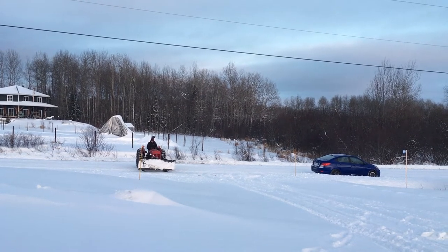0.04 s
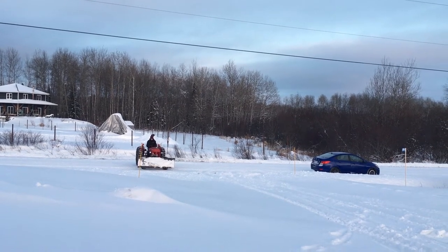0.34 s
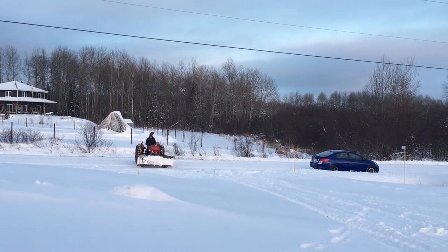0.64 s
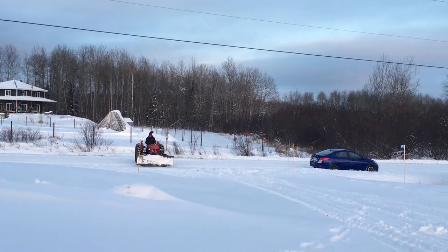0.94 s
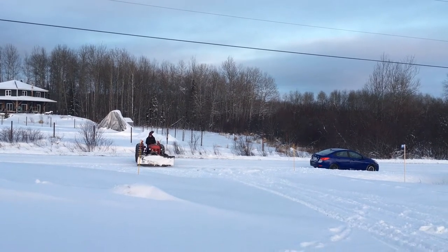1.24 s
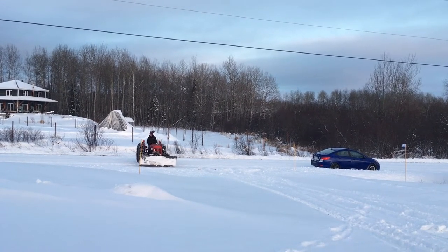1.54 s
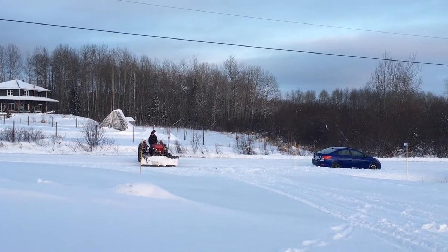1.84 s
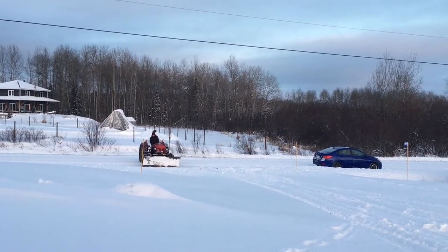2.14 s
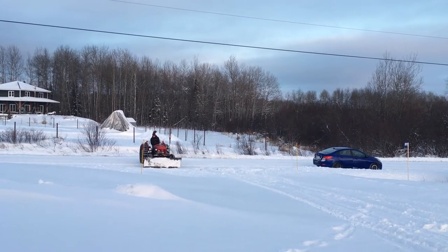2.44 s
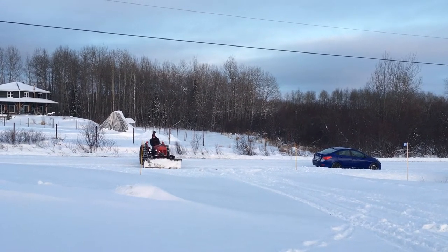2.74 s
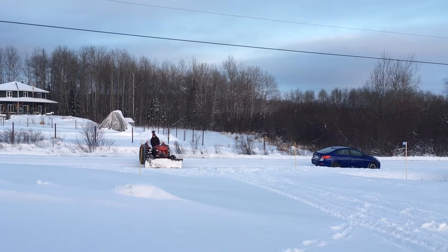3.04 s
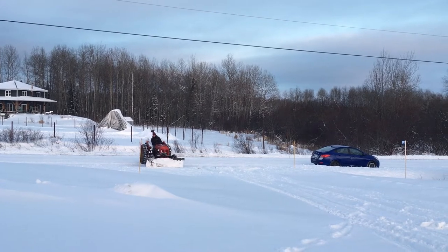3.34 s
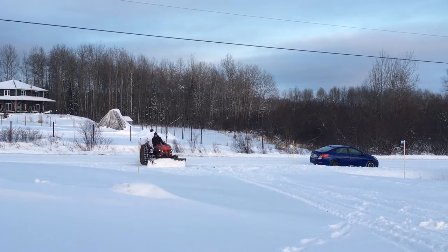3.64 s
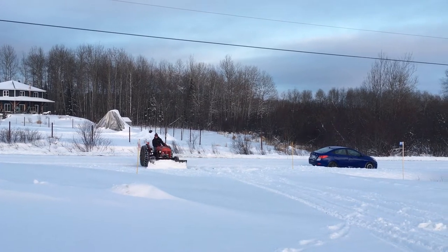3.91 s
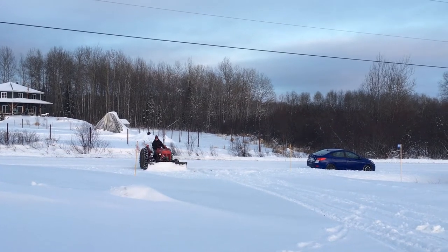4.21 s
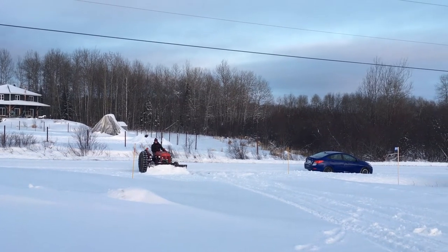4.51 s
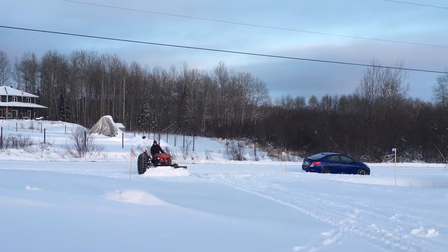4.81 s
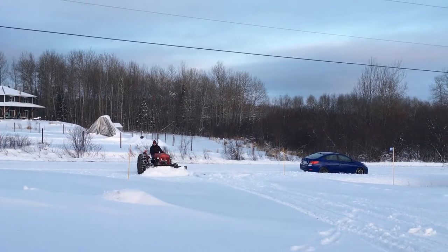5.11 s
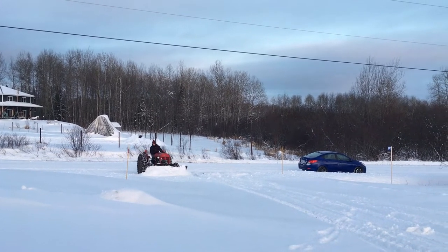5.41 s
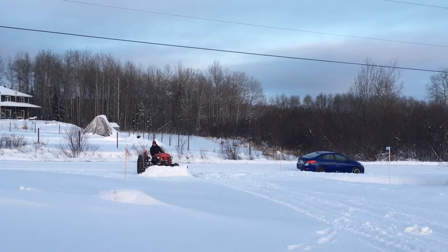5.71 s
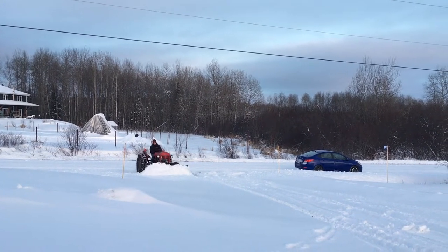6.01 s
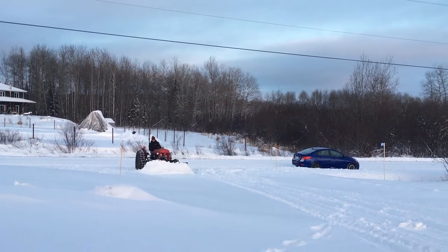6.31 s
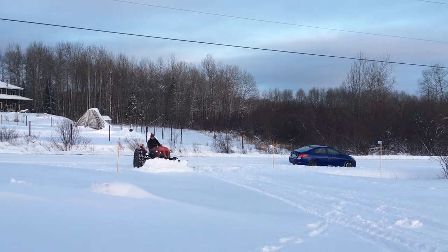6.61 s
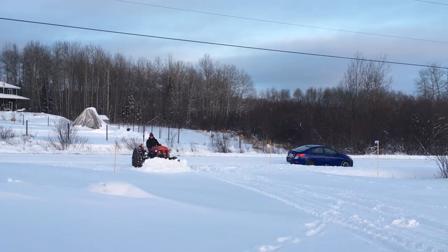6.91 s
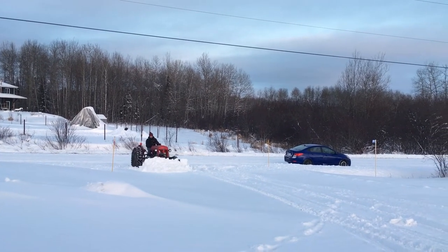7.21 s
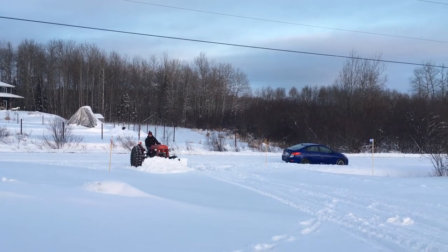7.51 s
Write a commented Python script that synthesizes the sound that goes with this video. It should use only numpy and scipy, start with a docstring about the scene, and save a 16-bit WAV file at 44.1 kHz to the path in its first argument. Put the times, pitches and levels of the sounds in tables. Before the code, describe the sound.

A four-cylinder petrol tractor idles some way off in an open, snowy yard with no echo. At about 0.5 seconds a faint switch clicks and a small geared motor starts a rasping whine, working the plough blade. The idle sags and stumbles around 1.5 seconds, and the whine drops slightly in pitch. At 2.4 seconds the throttle opens and the whine stops. The engine climbs and gets louder, straining with metallic knocks and a ragged growl, and the exhaust coughs at about 3 and 4 seconds. Around 3.5 seconds the blade bites the snow with a short, soft, grainy scrape. From there the engine holds high revs with a low exhaust drone, mechanical roar and occasional knocks, slowing slightly as the tractor comes nearer. Steel tyre chains clink thinly from about 3.3 seconds, jingling more often from 6 seconds until the end, near 7.7 seconds.

```python
"""A snowy yard, one microphone in the open, a four-cylinder petrol tractor idling some way off.
Half a second in, a switch clicks, a small geared motor whines to work the plough blade, and the idle sags.
At 2.4 s the throttle opens; the motor stops, and the straining engine knocks, growls and coughs.
Around 3.5 s the blade scrapes into the snow. The tractor comes nearer at high revs, exhaust
droning through its pipe, steel tyre chains jingling as the wheels roll."""
import sys
import numpy as np
from scipy import signal
from scipy.fft import rfft, irfft
from scipy.io import wavfile

SR = 44100
rng = np.random.default_rng(int(sys.argv[2]) if len(sys.argv) > 2 else 0)


def int16_out(signal):
    """Quantize to a 16-bit WAV file."""
    q = np.round(np.clip(np.atleast_2d(signal).T, -1, 1) * 32767)
    wavfile.write(sys.argv[1], SR, q.astype(np.int16))


N = 341775
T = np.arange(N) / SR
HZ = np.fft.rfftfreq(N, 1 / SR)
IDLE_RATE = 26.2  # firings per second
THROTTLE_OPENS_S = 2.428

# Knock of the four cylinders, in firing order. Each entry: relative level in dB.
CYLINDER_KNOCK_DB = [-2, 1.4, 5.5, 3]
# Resonances of engine block and bonnet. Each row: pitch in Hz, width in Hz, relative level in dB.
BLOCK_MODES = [(631, 77, -5), (847, 49, -5), (1020, 47, -6.5), (1206, 48, 4), (1770, 87, 4.5),
               (1870, 72, 4), (2390, 270, 2), (2983, 79, 0), (3145, 136, -4), (3540, 290, -8),
               (4130, 190, -23), (6450, 260, -18)]
# Resonances of small steel parts such as chain links. Each row: pitch in Hz, width in Hz, relative dB.
STEEL_MODES = [(6880, 60, 13), (8450, 120, -8), (9330, 54, 7), (11400, 74, 16), (11800, 150, 2),
               (13130, 90, 13), (13730, 53, 16), (15200, 60, 9), (15650, 250, 3)]


def amp(db):
    """Decibels to gain."""
    return 10 ** (np.asarray(db) / 20)


def unit(x):
    """Scales to rms 1."""
    return x / np.sqrt(np.mean(x ** 2) + 1e-20)


def curve(rows):
    """Joins rows of (seconds, value) into a value at every sample."""
    return np.interp(T, *np.transpose(rows))


def ramp(start_s, length_s):
    """Rises from 0 to 1 and stays there."""
    return np.clip((T - start_s) / length_s, 0, 1)


def response(spectrum):
    """Causal frequency response through rows of (Hz, dB)."""
    hz, db = np.transpose(spectrum)
    log_hz = np.log(abs(np.fft.fftfreq(N, 1 / SR)) + 1)
    log_gain = np.log(amp(np.interp(log_hz, np.log(hz + 1), db)))
    return np.exp(np.conj(signal.hilbert(log_gain)))[:len(HZ)]


def colour(x, spectrum):
    """Passes x through a body with the given spectrum; rms 1."""
    return unit(irfft(rfft(x) * response(spectrum), N))


def ringing(x, modes, direct=0):
    """Passes x through resonances (Hz, width in Hz, dB); a part may pass directly; rms 1."""
    body = direct + sum(amp(db) / (1 + 2j * (HZ - hz) / width) for hz, width, db in modes)
    return unit(irfft(rfft(x) * body, N))


def noise():
    """White noise."""
    return rng.standard_normal(N)


def wander(hz):
    """Random drift up to about the given rate; rms 1."""
    return unit(irfft(rfft(noise()) * np.exp(-(HZ / hz) ** 2), N))


def bursts(cycles, rise, fall):
    """An envelope that jumps and dies once a cycle; rise and fall are parts of a cycle."""
    age = cycles % 1
    return unit((1 - np.exp(-age / rise)) * np.exp(-age / fall))


def add(mix, start_s, sound):
    """Mixes a sound in at the given time."""
    part = mix[round(start_s * SR):][:len(sound)]
    part += sound[:len(part)]


def still_air(level_db=-53):
    """The faint, low hush of the yard around the microphone."""
    # Each row: frequency in Hz, relative level in dB.
    hush = [(25, -21), (60, 14.5), (200, -11.5), (400, -13.5), (1200, -10.5), (4000, -44), (5000, -46),
            (8500, -27), (9600, -31), (10400, -48), (11300, -32), (16000, -37)]
    return amp(level_db) * colour(noise(), hush)


def tyre_chains(links_per_s=420, spread_db=-4.5, tap_s=0.0073):
    """Many links tap in clumps as the wheels roll, most of them muffled by snow."""
    # Loudness of the chains. Each row: time in seconds, level in dB.
    levels = [(2.6, -83), (3.3, -48), (4.0, -67), (5.0, -48), (6.1, -49), (6.25, -45), (6.9, -44),
              (7.75, -41)]
    # Their overall colour. Each row: frequency in Hz, relative level in dB.
    jingle = [(3000, 0.5), (5200, -39), (7000, 7.5), (9300, 5.5), (10400, -2), (11400, 1.5), (14000, 2),
              (14800, -2), (16000, 5)]
    hits = rng.random(N) < amp(2.2 * wander(12)) * links_per_s / SR
    sizes = amp(spread_db * np.minimum(rng.exponential(1, N), 3))
    taps = signal.lfilter([1], [1, -np.exp(-1 / SR / tap_s)], hits * sizes) * noise()
    return amp(curve(levels)) * colour(ringing(taps, STEEL_MODES, direct=1.2), jingle)


def switch_and_clinks(ring_s=0.0074, click_s=0.004, click_db=-7, gain_db=-11, others_db=-9, scatter_db=3):
    """Metal strikes metal in switch or chain: a click and a short high ring, one mode above the others."""
    # A faint switch click as the blade motor starts, then the loudest chain clinks.
    # Each row: start in seconds, relative level in dB, leading pitch in Hz.
    strikes = [(0.537, -49, 13130), (1.886, -33.5, 11800), (3.46, -26, 8450), (3.5846, -28.5, 9330),
               (4.4712, -27, 9330), (5.3094, -34, 13130), (6.2362, -27, 13130), (6.499, -36, 6880),
               (6.8353, -32, 9330), (6.9156, -29, 13730), (7.0214, -25.5, 6880), (7.0927, -29, 13130),
               (7.3277, -24, 13130)]
    t, out = np.arange(SR // 16) / SR, np.zeros(N)
    mode_hz = np.array(STEEL_MODES)[:, 0]
    for start_s, db, lead_hz in strikes:
        heights = amp(others_db + scatter_db * rng.standard_normal(len(mode_hz)))
        heights[np.argmin(abs(mode_hz - lead_hz))] = 1
        tones = np.sin(2 * np.pi * (mode_hz[:, None] * t + rng.random((len(mode_hz), 1))))
        ring = heights @ tones * np.exp(-t / ring_s)
        click = np.diff(rng.standard_normal(len(t) + 1)) * np.exp(-t / click_s)
        add(out, start_s, amp(db + gain_db) * (ring + amp(click_db) * click))
    return out


def blade_scrape(centre_s=3.524, half_width_s=0.31, level_db=-45):
    """The blade bites into the snow crust: a short swell of fine grains."""
    # Each row: frequency in Hz, relative level in dB.
    crust = [(2000, 2.5), (5500, -7), (8500, 1.0), (10500, -5.0), (13500, -9), (16000, -21)]
    grains = colour(noise() * amp(2.0 * wander(900)), crust)
    return amp(level_db) * np.exp(-((T - centre_s) / half_width_s) ** 2) * grains


def blade_motor(running, level_db=-49, octave_db=10.5, whine_db=-2.7, rasp_db=-2.5, flutter=0.0021):
    """Gear teeth whine and rasp in a small housing; pitch and level sag as the blade takes the load."""
    # Each row: time in seconds, pitch in Hz.
    pitch = [(.58, 255), (.7, 264), (.81, 270), (.89, 265), (.99, 274), (1.08, 270), (1.17, 275),
             (1.27, 270), (1.37, 271), (1.46, 260), (1.54, 256), (1.63, 242), (1.75, 240.5), (1.82, 237),
             (1.93, 241.5), (2.03, 238), (2.13, 243), (2.24, 237), (2.36, 243), (2.42, 241), (2.55, 249)]
    # Colours of the gearbox whine and of the rasp. Each row: frequency in Hz, relative level in dB.
    gearbox = [(240, -1.5), (275, -10), (380, -11), (500, -4.5), (720, -4), (830, 0), (1100, -1),
               (1400, 3.5), (1670, 6.5), (1900, -10), (2450, -0.5), (2900, -5), (3300, -3), (3900, -10.5),
               (4400, -9.5), (4950, -25), (5300, -13), (6000, -36)]
    rasp_spectrum = [(250, -15.5), (400, -21), (600, -27), (1100, -19), (1600, 1.5), (2000, -9),
                     (3300, -6.5), (3800, -14), (4500, -12), (5000, -23), (5500, -22), (9000, -20.5),
                     (10400, -23), (11500, -22.5), (16000, -28)]
    hz = curve(pitch)
    meshes = np.cumsum(hz * (1 + flutter * wander(27.3))) / SR
    teeth = sum(np.cos(2 * np.pi * k * meshes + .5 * wander(34)) * amp(2.3 * wander(10))
                for k in range(1, 24))
    rasp = noise() * (.5 + bursts(meshes, rise=0.12, fall=0.68)) * amp(2.0 * wander(47))
    sound = amp(whine_db) * colour(teeth, gearbox) + amp(rasp_db) * colour(rasp, rasp_spectrum)
    surge_db = 1.5 * wander(24)
    return running * amp(level_db + octave_db * np.log2(hz / hz.max()) + surge_db) * sound


def coughs():
    """The exhaust coughs and thumps: low pushes of air, a cycle or two long."""
    # Each row: centre in seconds, peak level in dB, pitch in Hz, half-width in seconds.
    pushes = [(.152, -43, 330, .0017), (3.016, -24.5, 175, .0055), (3.158, -39, 190, .006),
              (4.066, -35.5, 185, .007), (4.073, -25, 62, .014)]
    return sum(-amp(db) * np.exp(-((T - s) / width) ** 2) * np.cos(2 * np.pi * hz * (T - s))
               for s, db, hz, width in pushes)


def growl(firings, strain, level_db=-49.5, ragged_db=2.5):
    """Under strain each puff leaves the pipe with a ragged low burst."""
    # Each row: frequency in Hz, relative level in dB.
    spectrum = [(50, -33), (100, -16), (125, 9), (150, -4), (200, -12.5), (270, -17), (400, -32),
                (900, -50)]
    puffs = noise() * (.5 + bursts(firings, rise=0.13, fall=.4)) * amp(ragged_db * wander(9.4))
    return amp(level_db) * strain * colour(puffs, spectrum)


def block_pings(firings, rattle_db, tick_db=-54.5, tick_hz=3090, knock_gain_db=-7.5):
    """Ticks, loose parts and hard knocks ping the block; one mode leads, narrow modes ring longest."""
    # The ring of the loose parts. Each entry: pitch in Hz.
    loose_hz = [900, 1002, 1030, 1203, 1778, 1832, 2380, 2980, 3410]
    # Hard knocks, most under load. Each row: time in seconds, relative level in dB, leading pitch in Hz.
    hard_knocks = [(0.083, -44.5, 3040), (0.154, -43, 1630), (0.521, -46.5, 3100), (2.51, -38, 1730),
                   (2.625, -37.5, 1720), (2.66, -35, 1730), (2.70, -34.5, 1810), (2.741, -36.5, 1720),
                   (2.774, -36, 1760), (2.812, -40, 1800), (2.848, -33.5, 1780), (2.876, -38, 3040),
                   (2.938, -28, 1863), (2.967, -35, 1863), (2.992, -35.5, 1860), (3.019, -36, 2990),
                   (3.045, -38, 3000), (3.161, -34, 3100), (3.27, -33, 3000), (3.29, -33.5, 3050),
                   (3.309, -31, 1810), (3.368, -33.5, 1805), (3.405, -29, 1880), (3.88, -35, 1790),
                   (4.94, -29.5, 1880), (5.456, -40, 1710), (5.655, -31, 1920), (5.729, -31.5, 1870),
                   (6.137, -33, 1770), (6.695, -35, 1780), (7.085, -33, 1750), (7.285, -35, 1856)]
    fired_s = T[np.flatnonzero(np.diff(np.floor(firings)) > 0)]
    # One cylinder ticks once an engine cycle. A blow: seconds, dB, leading Hz, that mode's lead in dB.
    blows = [(s, tick_db, tick_hz, 4) for s in fired_s[2::len(CYLINDER_KNOCK_DB)]]
    for s in fired_s:  # a loose part rattles on every firing
        db = rattle_db[round(s * SR)] + 3 * rng.standard_normal()
        lead_hz = rng.choice(loose_hz) * (1 + 0.0184 * rng.standard_normal())
        blows.append((s, db, lead_hz, 4))
    for s, db, lead_hz in hard_knocks:  # each lands on the nearest firing
        blows.append((fired_s[np.argmin(abs(fired_s - s))], db + knock_gain_db, lead_hz, 6.5))

    rise_s, ring_stretch, tilt_db, scatter_db = 0.0032, 1.96, 2, 4
    t, pings = np.arange(SR // 16) / SR, np.zeros(N)
    block_hz, width, mode_db = np.array(BLOCK_MODES).T[:, :, None]
    dying = np.exp(-np.pi * width * t / ring_stretch) * (1 - np.exp(-t / rise_s))
    for s, db, lead_hz, lead_db in blows:
        hz, lead = block_hz.copy(), np.argmin(abs(block_hz - lead_hz))
        heights = amp(mode_db + tilt_db * np.log2(hz) + scatter_db * rng.standard_normal(hz.shape))
        hz[lead], heights[lead] = lead_hz, heights.max() * amp(lead_db)
        envelopes = dying * heights
        envelopes /= np.sqrt((envelopes ** 2).sum(0).max() / 2)
        tones = np.sin(2 * np.pi * (hz * t + rng.random(hz.shape)))
        add(pings, s, amp(db) * (envelopes * tones).sum(0))
    return pings


def machinery(firings, throttle, strain, level_db, scatter_db=2.5):
    """Each firing knocks the block, over the throbbing roar of fan and gears."""
    # Fan and gears. Each row: frequency in Hz, relative level in dB.
    roar_spectrum = [(120, -20.5), (250, -13.5), (370, -7.5), (450, -13.5), (560, -4.5), (720, -5.5),
                     (900, -0.5), (1200, -2.5), (1500, -2.5), (1880, -4.5), (2150, -7.5), (2750, -11.5),
                     (3050, -8.5), (3800, -13.5), (4900, -25), (9000, -42.5)]
    count = np.floor(firings).astype(int)
    cylinder_db = np.take(CYLINDER_KNOCK_DB, count, mode="wrap")
    force = amp(cylinder_db + scatter_db * rng.standard_normal(500)[count])
    knock = ringing(force * bursts(firings, rise=0.14, fall=0.24) * noise(), BLOCK_MODES)
    throb = 1 + .22 * bursts(firings, rise=.14, fall=.4)
    roar = colour(noise() * throb * amp(0.2 * wander(210) + .5 * wander(51)), roar_spectrum)
    knock_share = 0.16 * (1 - throttle) + 0.087 * throttle + 0.47 * strain
    return amp(level_db) * (np.sqrt(knock_share) * knock + np.sqrt(1 - knock_share) * roar)


def hiss_and_valves(firings, throttle, strain, level_db, valve_db=-9.5, valve_idle_db=1):
    """Each firing ticks a valve and spits a puff of exhaust hiss, harder under strain."""
    # Exhaust hiss. Each row: frequency in Hz, relative level in dB.
    hiss_spectrum = [(2500, -34), (4900, -5), (5200, 7), (5500, 4), (6400, 4.5), (7600, -1), (9400, 3.5),
                     (10400, -2), (11500, -1.5), (13500, -4), (14700, -7), (16000, -5.5)]
    # Ring of the valve gear. Each row: pitch in Hz, width in Hz, relative level in dB.
    valve_modes = [(6380, 240, 4), (8640, 200, -7), (11100, 500, -14)]
    puffs = 1 + (0.2 + 0.14 * strain) * bursts(firings, rise=0.073, fall=0.15)
    hiss = colour(noise() * puffs * amp(0.45 * wander(500) + wander(30)), hiss_spectrum)
    valves = ringing(bursts(firings, rise=0.057, fall=0.095) * noise(), valve_modes)
    return amp(level_db) * (hiss + amp(valve_db + valve_idle_db * (1 - throttle)) * valves)


def puff_shape(rate, strain):
    """Puffs are sharp at idle and stumble as it slows; once the pipe fills they are long and round."""
    full = ramp(2.68, 0.095)
    idle_tilt_db = 9 + 0.63 * (rate - IDLE_RATE)
    tilt_db = (1 - full) * idle_tilt_db + full * strain * 11  # per octave of order
    top_order = np.maximum(4.92 + full * (2.47 - 5.2 * strain), 1)  # higher orders fall away
    stumble = 0.06 * (IDLE_RATE / rate) ** 3
    uneven = (1 - full) * stumble + full * 0.059 + strain * 0.2
    return tilt_db, top_order, uneven


def exhaust(firings, rate, strain, noise_db, rumble_db=-13):
    """The orders of the firing rate slide through the pipe's resonances; ragged burning adds rumble."""
    # The exhaust note at the microphone. Each row: time in seconds, level in dB.
    note_levels = [(0.05, -35), (0.67, -34.5), (1.21, -39), (1.29, -35.5), (1.77, -41.5), (1.79, -37),
                   (2.34, -37), (2.71, -34.5), (2.73, -38), (2.86, -28.5), (3.01, -35.5), (3.24, -28),
                   (3.33, -32.5), (3.67, -26), (5.35, -27), (6.61, -32), (7.75, -31)]
    # Colours of silencer with tailpipe, and of the rumble. Each row: frequency in Hz, relative dB.
    pipe_spectrum = [(20, -41), (28, -54), (35, 0), (42, 10), (58, 9), (82, 4.5), (113, 7.5), (126, -10.5),
                     (138, -31), (151, -9), (162, -29), (172, -18.5), (200, -29.5), (230, -30.5),
                     (290, -25), (400, -29)]
    rumble_spectrum = [(20, -42), (28, -25), (40, 15.5), (70, -11.5), (112, 12.5), (135, -6), (165, -49),
                       (260, -19), (500, -25), (1500, -56)]
    tilt_db, top_order, uneven = puff_shape(rate, strain)
    pipe, note, power = response(pipe_spectrum), 0, 0
    shaken = firings + .07 * uneven * wander(14)
    for order in range(1, 9):
        puff = amp(tilt_db * np.log2(order)) / (1 + (order / top_order) ** 8)
        height = np.interp(order * rate, HZ, pipe) * puff
        note += (height * np.exp(2j * np.pi * order * shaken)).real
        power += abs(height) ** 2 / 2
    note = note / np.sqrt(power) * (1 + .5 * uneven * wander(44))
    rumble = colour(noise(), rumble_spectrum) * (1.33 + 6 * uneven) * amp(noise_db + rumble_db)
    return amp(curve(note_levels)) * note + rumble


def loudness(law, rate, throttle):
    """Level in dB from throttle, engine speed and the approach to the microphone."""
    idle_db, open_db, octave_db, approach_db = law
    driving_s = np.maximum(T - THROTTLE_OPENS_S, 0)
    return idle_db + open_db * throttle + octave_db * np.log2(rate / IDLE_RATE) + approach_db * driving_s


def scene():
    """The tractor from one spot in the open yard; snow swallows the echoes."""
    # Engine speed. Each row: time in seconds, firings per second.
    speed = [(0.0, 27.44), (0.65, 27.4), (0.9, 26.5), (1.2, 25.1), (1.36, 23), (1.5, 19.7), (1.64, 18.5),
             (1.95, 20.8), (2.3, 19.9), (2.5, 19.9), (2.62, 21.3), (2.75, 26.45), (3.05, 40.15),
             (3.3, 50.8), (3.555, 55.09), (3.917, 57.59), (4.5, 57.32), (4.994, 56.95), (5.7, 54.55),
             (6.46, 51.85), (7.1, 50.79), (7.75, 49.8)]
    # Loudness of engine noise and of hiss. Each lists: dB at idle, then dB added by open throttle,
    # per octave of speed and per second of approach.
    noise_law = (-57, 10, 4.5, 0.65)
    hiss_law = (-72, 11.5, 6.5, 1.66)
    rate = curve(speed)
    firings = np.cumsum(rate) / SR - 0.0085 * rate[0]  # running count; the first comes at 8.5 ms
    throttle = ramp(THROTTLE_OPENS_S, 0.18)
    strain = ramp(THROTTLE_OPENS_S, 0.31) * (1 - ramp(3.01, 0.46))  # eases as the engine catches up
    motor_on = ramp(0.52, 0.092) * (1 - ramp(2.508, 0.092))
    load_db = 4.5 * motor_on  # the engine is louder while it drives the blade motor
    noise_db = loudness(noise_law, rate, throttle) + load_db
    hiss_db = loudness(hiss_law, rate, throttle) + load_db + 2 * strain
    rattle_db = noise_db - 14 + 6.5 * throttle - strain

    engine = exhaust(firings, rate, strain, noise_db) + growl(firings, strain) + coughs()
    engine += block_pings(firings, rattle_db)
    engine += machinery(firings, throttle, strain, noise_db)
    engine += hiss_and_valves(firings, throttle, strain, hiss_db)
    plough = blade_motor(motor_on) + blade_scrape()
    return (engine + plough + tyre_chains() + switch_and_clinks() + still_air())[None]


def record(dry):
    """The recorder behind the microphone passes nothing above 15.8 kHz."""
    return irfft(rfft(dry) * np.clip((15800 - HZ) / 100, 0, 1), N)


dry = scene()
out = record(dry)
int16_out(out)
```